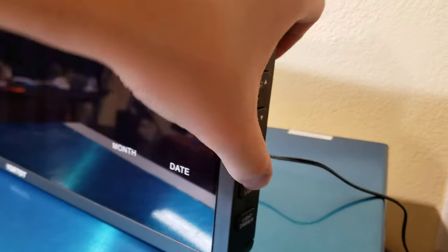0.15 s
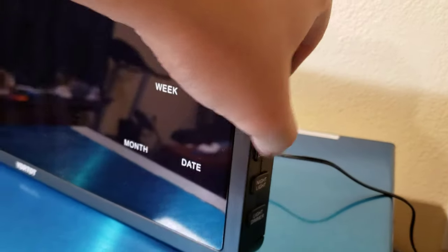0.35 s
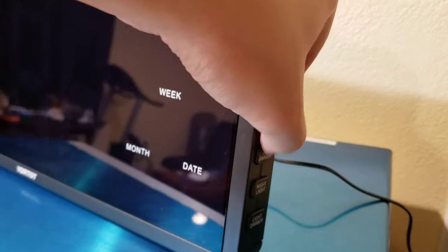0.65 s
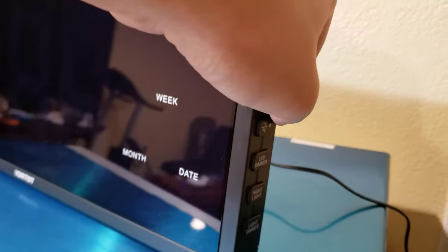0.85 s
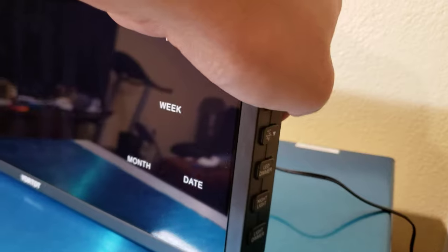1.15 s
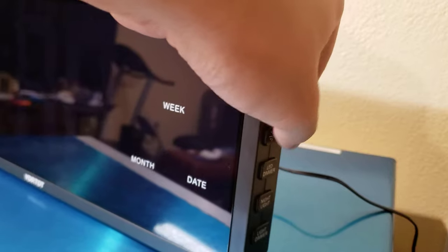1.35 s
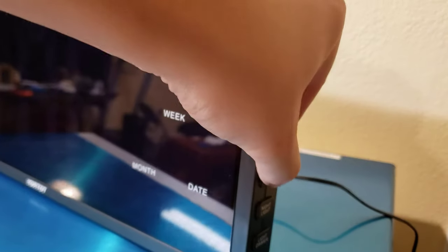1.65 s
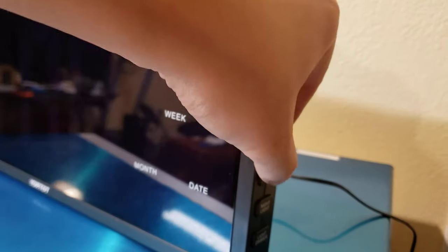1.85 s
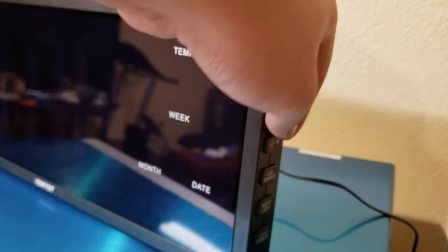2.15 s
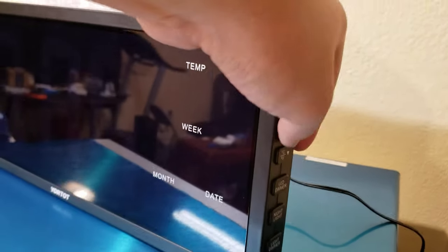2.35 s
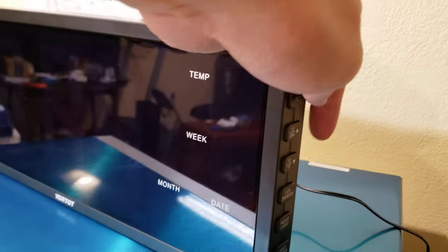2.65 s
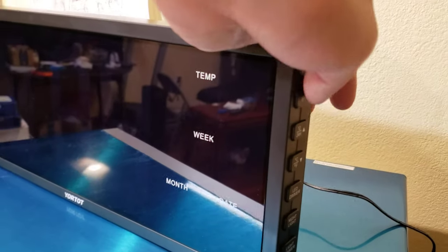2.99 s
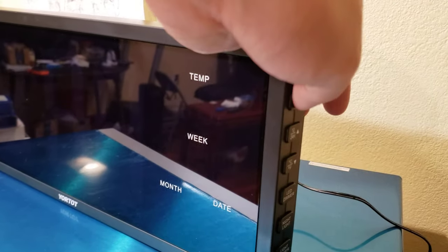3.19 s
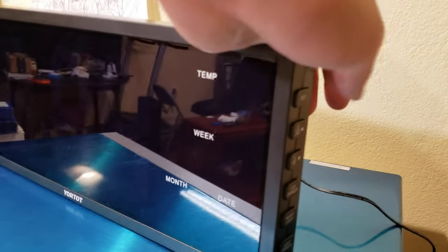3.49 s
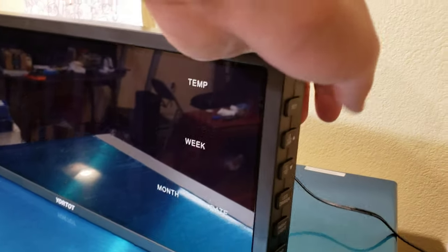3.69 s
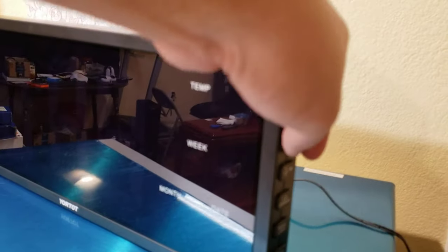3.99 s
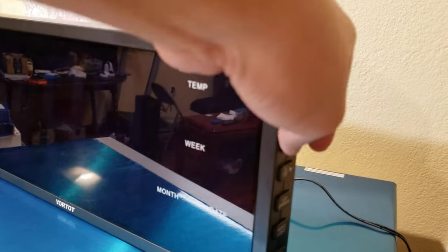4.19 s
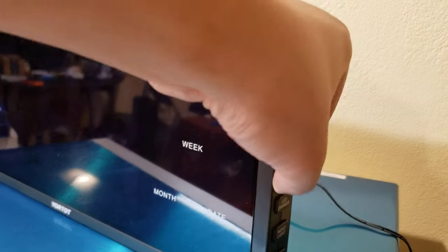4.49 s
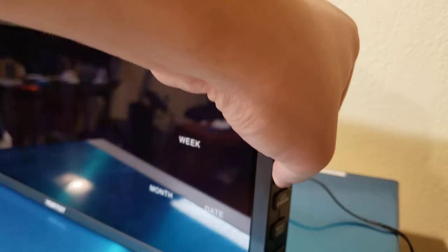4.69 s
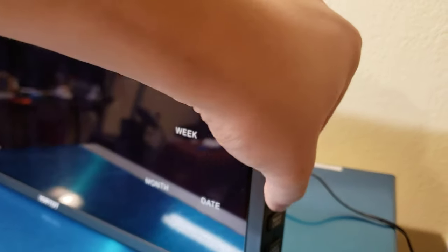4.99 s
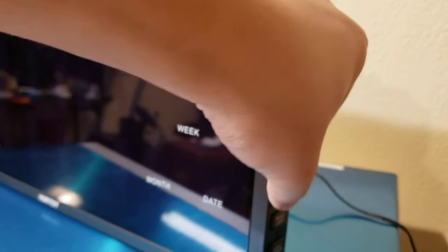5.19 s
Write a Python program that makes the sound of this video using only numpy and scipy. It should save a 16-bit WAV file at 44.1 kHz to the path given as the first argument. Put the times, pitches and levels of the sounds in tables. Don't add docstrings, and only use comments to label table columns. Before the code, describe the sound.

Close stereo microphones catch a hand on a thin plastic display case in a small quiet room. Faint skin rubbing comes first, then a bright fingernail tick and a sharp button snap with a softer release. After a pause, more clicks follow, with a brief gritty scrape before the loudest snap and a run of clicks to the end. Low rumble, hum and hiss lie beneath.

```python
import sys
import numpy as np
from scipy import signal
from scipy.fft import rfft, irfft, next_fast_len
from scipy.io import wavfile
from scipy.ndimage import uniform_filter1d

SR = 44100
rng = np.random.default_rng(int(sys.argv[2]) if len(sys.argv) > 2 else 0)


def natural_amplitude(level_db):
    exponent = np.asarray(level_db, float) / 20
    return 10 ** exponent


def store_wav(level_fs):
    pcm = np.round(np.clip(np.atleast_2d(level_fs), -1, 1) * 32767)
    wavfile.write(sys.argv[1], SR, pcm.T.astype(np.int16))


N = 235449
RATTLE_S = 0.043

# f/Hz, width/Hz, level/dB
CASE_MODES = [(356, 110, -11), (513, 220, -8), (823.6, 60, -1), (1110, 122, -0.5), (1640, 140, -7)]


def evened(x):
    return x / np.sqrt(np.mean(x ** 2) + 1e-20)


def read(points, hz):
    f, value = np.transpose(points)
    return np.interp(np.log(hz + 1), np.log(f + 1), value)


def curve(rows, column=1):
    rows = np.asarray(rows)
    return np.interp(np.arange(N) / SR, rows[:, 0], rows[:, column], -120, -120)


def swells(rows):
    t = np.arange(N) / SR
    return sum(natural_amplitude(db - 20 * np.maximum((s - t) / rise, (t - s) / fall)) for s, db, rise, fall in rows)


def add(mix, s, sound):
    part = mix[:, round(s * SR):][:, :sound.shape[1]]
    part += sound[:, :part.shape[1]]


def ring(x, modes):
    out = 0
    for k, (hz, width, db) in enumerate(modes):
        r, w = np.exp(-np.pi * width / SR), 2 * np.pi * hz / SR
        mode = signal.lfilter([0, np.sin(w)], [1, -2 * r * np.cos(w), r * r], x)
        out = out + (-1) ** k * natural_amplitude(db) * mode
    return out


def knocks(size, per_s, spread_db, shared):
    when, big, sign = rng.random((size, 3, 3)).T
    sizes = natural_amplitude(spread_db * -np.log(big + 0.0033))
    train = (when < per_s / SR) * sizes * np.sign(sign - .5)
    return shared * train[0] + (1 - shared) * train[1:]


def noise(spectrum, size, patchy_db):
    # f/Hz, correlation
    likeness = [(60, .95), (150, .96), (380, .96), (650, .8), (1200, .3), (2400, .1), (15000, .01)]
    frames, hz = 4 * N // size + 5, np.fft.rfftfreq(size, 1 / SR)
    a, b, c, d, patches = rng.standard_normal((frames, len(hz), 5)).T
    patches = uniform_filter1d(patches, size=9, axis=0)
    patches = evened(uniform_filter1d(patches, size=9, axis=1))
    same = np.clip(read(likeness, hz), -1, 1)[:, None]
    left = a + 1j * b
    right = same * left + np.sqrt(1 - same ** 2) * (c + 1j * d)
    z = np.array([left, right]) * natural_amplitude(read(spectrum, hz)[:, None] + patchy_db * patches)
    return evened(signal.istft(z, nperseg=size, noverlap=3 * size // 4)[1][:, :N])


def click(s, peak_db, cap_hz, ring_db, body_db, blur, rattle_s):
    # f/Hz, width/Hz, level/dB
    cap_modes = [(1843, 1600, 0.5), (3158, 2220, 4.5), (4297, 442, -4), (4970, 4970, 3), (7850, 3200, -5)]
    # f/Hz, width/Hz, level/dB
    port_peaks = [(11940, 3300, -4.5), (15550, 680, -12)]
    start_lag_s = .0009
    t = np.arange(6000) / SR

    drive = knocks(len(t), 6000, 0.86, 0.12) * natural_amplitude(-60 * t / rattle_s)
    drive[:, 4] += 1.5
    cap = ring(drive, cap_modes) + ring(drive, [(cap_hz, 450 * np.sqrt(blur), ring_db)])

    swing = knocks(len(t), 6000, 2.3, 0.58) * natural_amplitude(-60 * t / max(rattle_s, .02))
    swing = swing * np.minimum(t / 0.0024, 1)
    body = ring(swing, [(hz, width * blur, db) for hz, width, db in CASE_MODES])

    fizz = knocks(len(t), 12000, 1.0, 0.28) * natural_amplitude(-60 * t / 0.059)
    bright = ring(fizz, port_peaks)
    bright_db = -35.5 - 0.48 * peak_db

    shorter = np.log(RATTLE_S / rattle_s)
    levels = ((cap, -1.5 + 0.84 * shorter), (body, body_db + 9.0 + 0.3 * shorter), (bright, bright_db + 12.0))
    parts = [natural_amplitude(db) * x / abs(x).max() for x, db in levels]
    return s + start_lag_s, natural_amplitude(peak_db + 2.5) * sum(parts)


def presses():
    # t/s, peak level/dB, cap ring f/Hz, cap ring level/dB, case body level/dB
    snaps = [(1.691, -38, 3000, -13, -38), (1.696, -19, 3034, -2, -22.5), (1.852, -38.5, 3850, -3, -1.5),
             (3.26, -20.5, 2220, -18, -23.5), (3.412, -38, 3220, -3, -6), (4.1094, -18, 4240, 20.5, -22.5),
             (4.309, -23, 3960, -6, -17), (4.574, -64, 3050, -5, -32), (4.622, -27, 2790, -3, -24),
             (4.773, -37, 2690, -0.5, -12), (5.08, -21.5, 3170, -2.5, -21.5),
             (5.239, -21.5, 3780, -3, -18.5)]
    near, radiated = np.zeros((2, 2, N))
    for row in snaps:
        add(near, *click(*row, blur=1, rattle_s=RATTLE_S))
        add(radiated, *click(*row, blur=2.2, rattle_s=.0008))
    return near, radiated


def tick(s, peak_db, ring_hz, t60):
    drive = np.zeros((2, 3000))
    drive[0, 2], drive[1, 0] = .8, 1.2
    drive = np.diff(drive, prepend=0) * 1.23
    edge = ring(drive, [(3000, 1100, -27.5), (7200, 520, -10.5), (11000, 7100, -3.0)])
    return s, natural_amplitude(peak_db + 1.0) * (ring(drive, [(ring_hz, 2.1 / t60, 0)]) + edge)


def nail_ticks():
    # t/s, peak level/dB, ring f/Hz, t60/s
    touches = [
        (0.705, -59, 3450, 0.011),
        (1.5592, -24, 4550, 0.011),
        (1.5647, -40.5, 4350, 0.007),
        (1.584, -47.5, 4500, 0.0051),
        (1.648, -44.5, 3280, 0.0087),
        (1.926, -55, 3230, 0.019),
        (3.995, -49, 3900, 0.004),
    ]
    ticks = np.zeros((2, N))
    for row in touches:
        add(ticks, *tick(*row))
    return ticks


def scrape():
    # t/s, slip force level/dB, grit brightness level/dB
    drags = [
        [(3.8, -72, -14), (3.808, -58, 0), (3.83, -43.5, -20), (3.86, -42, -31.5)],
        [(3.86, -58, -31), (3.866, -42.5, -0.5), (3.902, -54, 15), (3.968, -64, -13), (4.06, -106, -16)],
    ]
    # f/Hz, level/dB per Hz
    grit_colour = [(880, -34.5), (1500, -8.5), (3150, -9), (3410, -12), (3590, -14.5), (5770, -23),
                   (8490, -34.5), (16000, -41)]
    slips = np.concatenate(drags)
    force_db = curve(slips)
    panel = ring(knocks(N, 640, 1.76, 0.72), CASE_MODES[1:4] + [(2300, 610, -4.5)])
    crackle = .5 + uniform_filter1d(abs(knocks(N, 470, 1.4, 0.5)), size=70) * 25
    grit = noise(grit_colour, size=256, patchy_db=-2.0) * crackle
    grit_db = force_db + curve(slips, column=2) - 4.0
    return natural_amplitude(force_db - 0.5) * evened(panel) + natural_amplitude(grit_db) * evened(grit)


def thud(s, peak_db):
    t = np.arange(6000) / SR
    blows = knocks(len(t), 2800, 1.7, 0.76) * natural_amplitude(-60 * t / 0.1)
    sound = ring(blows, [(298, 140, 2.5), (605, 200, -1.0), (890, 210, -5.0)])
    return s, natural_amplitude(peak_db) * sound / abs(sound).max()


def palm_thuds():
    # t/s, peak level/dB
    bumps = [
        (1.014, -54),
        (3.662, -60),
    ]
    thuds = np.zeros((2, N))
    for row in bumps:
        add(thuds, *thud(*row))
    return thuds


def skin_rubs():
    # peak t/s, peak level/dB, rise/s, fall/s
    slides = [
        (0.006, -69.5, 0.024, 0.25),
        (0.265, -62, 0.11, 0.057),
        (0.41, -67.5, 0.11, 0.14),
        (0.706, -75, 0.017, 0.19),
        (0.886, -74, 0.042, .04),
        (2.98, -81.5, .06, 0.61),
        (4.83, -71, 0.09, 0.13),
        (4.93, -67.5, 0.097, 0.12),
    ]
    # f/Hz, level/dB per Hz
    skin_colour = [(590, -27), (1000, -9.5), (1500, -30), (2310, -13.5), (3710, -12.5), (4360, -10.5),
                   (5310, -17), (7440, -9.5), (8360, -25.5), (16000, -8)]
    return swells(slides) * noise(skin_colour, size=512, patchy_db=1.5)


def palm_grip():
    # peak t/s, peak level/dB, rise/s, fall/s
    shifts = [
        (0.71, -70.5, 0.018, 0.062),
        (0.86, -80, 0.24, 0.35),
        (2.07, -74, 0.11, 0.59),
        (2.32, -85, 0.13, 0.58),
        (2.53, -74.5, 0.19, 0.16),
        (3.67, -77, 0.13, 0.84),
        (4.83, -59.5, 0.09, 0.16),
    ]
    # f/Hz, level/dB per Hz
    palm_colour = [(350, -26.5), (600, -4), (1110, -3), (1200, -7.5), (1310, -3), (1870, -6.5), (2130, -1),
                   (2380, -9.5), (2830, -8.5), (5300, -18), (8000, -16.5), (10400, -77), (17600, -120)]
    return swells(shifts) * noise(palm_colour, size=1024, patchy_db=2.5)


def room(x):
    # f/Hz, t60/s
    decay = [(150, 0.63), (400, 0.2), (1040, 0.29), (2760, 0.31), (4300, 0.26), (7280, 0.3), (15000, 0.22)]
    # f/Hz, level/dB
    room_colour = [(200, 4), (500, 3), (1000, 2), (4000, 0.5), (8000, -2.5), (15000, 0)]
    wall_s, wall_db = .036, 3.5
    taps = np.zeros((2, SR))
    at = np.arange(300, SR - 20, 20) + rng.integers(0, 20, (2, (SR - 301) // 20))
    np.put_along_axis(taps, at, rng.choice([-1., 1.], at.shape), 1)
    low = signal.butter(2, 750, fs=SR, output="sos")
    taps[1] += signal.sosfiltfilt(low, taps[0] - taps[1])
    hz, t, z = signal.stft(taps, SR, nperseg=256)
    z = z * natural_amplitude(read(room_colour, hz)[:, None] - 60 * t / read(decay, hz)[:, None])
    z = z * natural_amplitude(wall_db * (t > wall_s))
    tail = signal.istft(z, SR, nperseg=256)[1]
    return signal.fftconvolve(x.mean(0)[None], tail / np.linalg.norm(tail[0]), axes=1)[:, :N]


def low_rumble():
    # peak t/s, peak level/dB
    surges = [(0.028, -54.5), (1.05, -63.5), (1.64, -61.5), (1.735, -48), (1.888, -52), (2.14, -54),
              (2.58, -67), (3.3, -55), (3.449, -52), (3.56, -90), (3.889, -49), (4.145, -51), (4.347, -50),
              (4.66, -57.5), (4.818, -48), (5.111, -51), (5.292, -45.5)]
    # f/Hz, level/dB per Hz
    low_colour = [(15, -36), (25, -21), (42, -11), (64, -3.5), (92, -26), (124, -25.5), (147, -19.5),
                  (284, -14.5), (315, -28.5), (419, -16.5), (600, -33), (647, -38.5), (677, -46),
                  (900, -45), (1170, -63.5), (1980, -120)]
    # f/Hz, width/Hz, level/dB
    low_tones = [(116.7, 12, 1.5), (161.7, 4.3, -2), (217.7, 33, 1.5), (288, 8.7, -3), (371.5, 11, 7)]
    rise_s, fall_s = 0.07, 0.19
    lows = noise(low_colour, size=2048, patchy_db=3.0)
    surging = swells([(s, db, rise_s, fall_s) for s, db in surges])
    lows = lows + natural_amplitude(-7.5) * evened(ring(lows, low_tones))
    above = signal.sosfilt(signal.butter(2, 151, "high", fs=SR, output="sos"), lows)
    return natural_amplitude(-68.5) * lows + surging * (above + natural_amplitude(-6.5) * lows)


def hum():
    # t/s, level/dB
    hum_level = [(0.0, -71.5), (0.31, -54), (1.43, -88), (1.58, -64.5), (2.15, -51), (2.38, -58),
                 (2.47, -52.5), (2.74, -62), (2.86, -51.5), (2.91, -70.5), (3.06, -54.5), (3.84, -73.5),
                 (3.97, -67.5), (4.37, -66), (4.8, -50.5), (5.19, -59), (5.28, -49), (5.34, -49)]
    hum_hz, width_hz, fuzz, octave_db = 59.3, 6., .22, -13
    turn = np.exp(2j * np.pi * hum_hz * np.arange(N) / SR)
    r = np.exp(-np.pi * width_hz / SR)
    blur = signal.lfilter([1], [1, -2 * r, r * r], rng.standard_normal((3, N, 2)) @ [1, 1j])
    blur = (blur[0] + 0.32 * blur[1:]) / np.std(blur)
    tone = turn * (1 - fuzz + fuzz * blur) + natural_amplitude(octave_db) * turn ** 2 * blur[:, ::-1]
    return natural_amplitude(curve(hum_level)) * evened(tone.real)


def fan():
    # f/Hz, width/Hz, level/dB
    whines = [(600, 83, -85.5), (1480, 32, -90.5), (2460, 34, -92.5), (2833, 59, -91)]
    air = rng.standard_normal((2, N))
    return sum(natural_amplitude(db) * evened(ring(air, [(hz, width, 0)])) for hz, width, db in whines)


def microphone_hiss():
    # f/Hz, level/dB per Hz
    hiss_colour = [(240, -33), (400, -1), (574, -27.5), (650, -21.5), (682, -19), (1520, -26),
                   (2140, -27.5), (2390, -29), (3170, -27), (4620, -32), (8120, -37.5), (15200, -19.5),
                   (17000, -44.5)]
    return natural_amplitude(-73) * noise(hiss_colour, size=1024, patchy_db=0.0)


def scene():
    near, radiated = presses()
    ticks = nail_ticks()
    drag = scrape()
    wet = natural_amplitude(-4) * room(radiated + drag + natural_amplitude(-12.5) * ticks)
    case = near + drag + palm_thuds() + ticks
    hand = skin_rubs() + palm_grip()
    return case + wet + hand + low_rumble() + hum() + fan() + microphone_hiss()


def low_pass(x):
    return signal.sosfilt(signal.butter(12, 17130, fs=SR, output="sos"), x)


def record(dry):
    # f/Hz, level/dB
    tilt = [(60, 1), (130, 3.5), (500, 2), (1000, 3), (2000, -1.5), (4000, 0), (8000, -2), (15000, -3)]
    low_cut_hz, top_hz = 48.3, 16080
    size = next_fast_len(N)
    hz = np.fft.rfftfreq(size, 1 / SR)
    tilt_db = read(tilt, hz) / 2
    edge_db = -np.clip((hz - top_hz) / 12, 0, 80)
    edge_db -= 10 * np.log10(1 + (low_cut_hz / (hz + 1)) ** 6)
    response = natural_amplitude(np.array([tilt_db, -tilt_db]) + edge_db)
    coloured = irfft(rfft(dry, size) * response, size)[:, :N]
    return low_pass(coloured)


dry = scene()
out = record(dry)
store_wav(out)
```